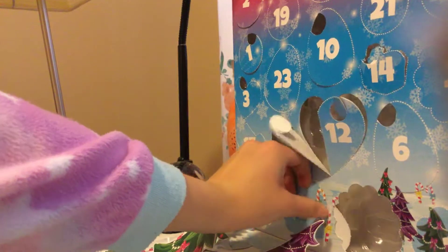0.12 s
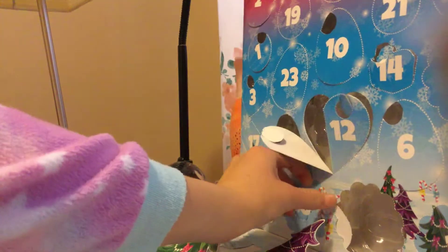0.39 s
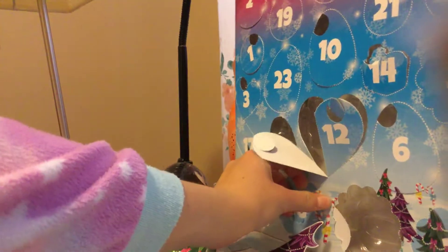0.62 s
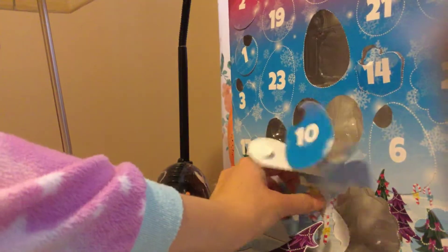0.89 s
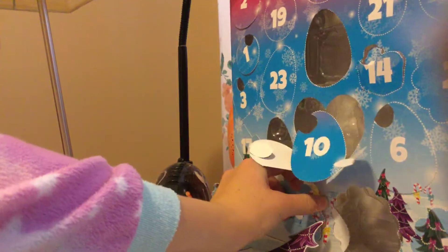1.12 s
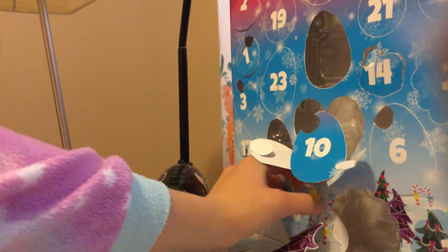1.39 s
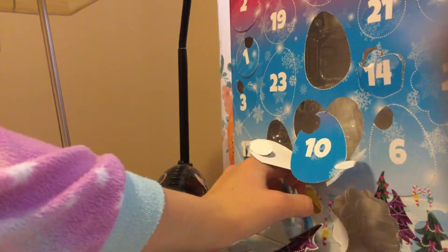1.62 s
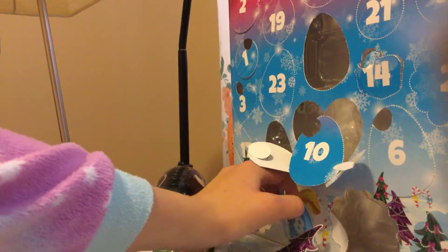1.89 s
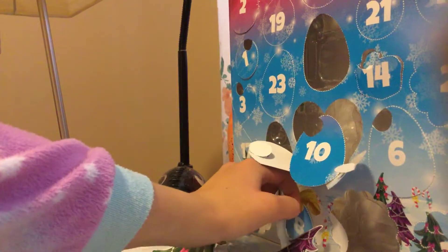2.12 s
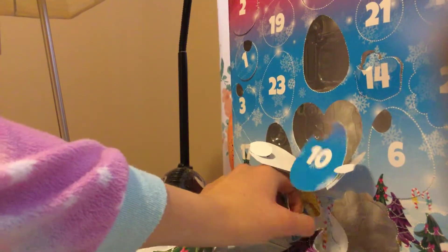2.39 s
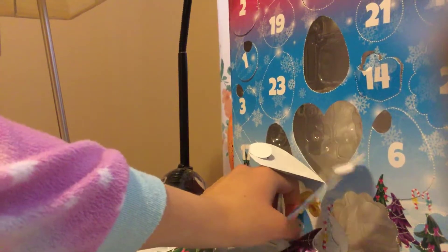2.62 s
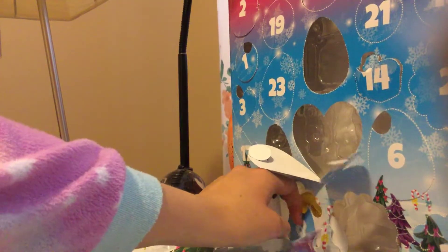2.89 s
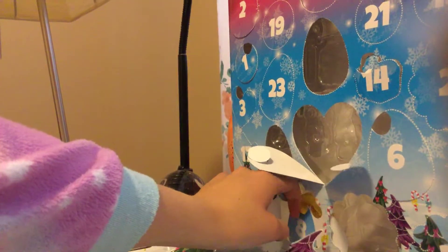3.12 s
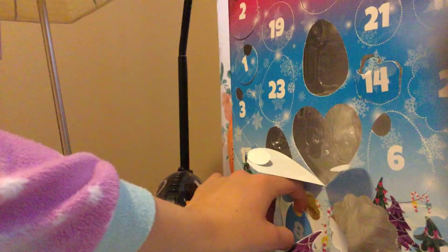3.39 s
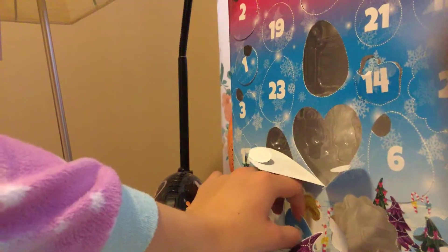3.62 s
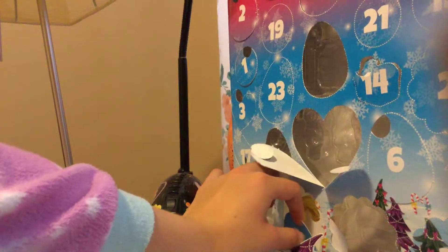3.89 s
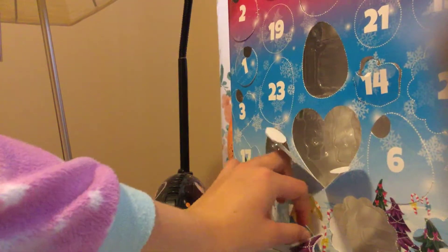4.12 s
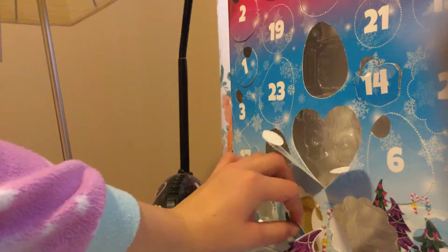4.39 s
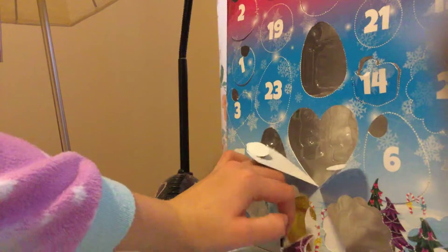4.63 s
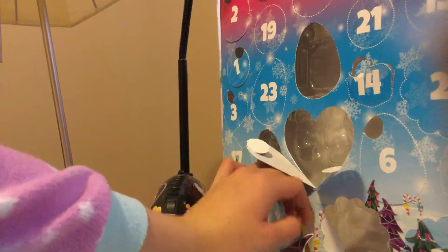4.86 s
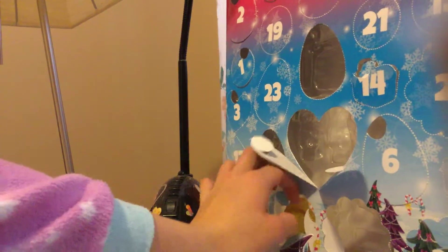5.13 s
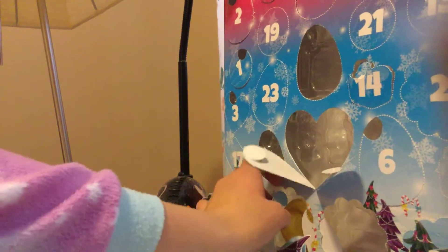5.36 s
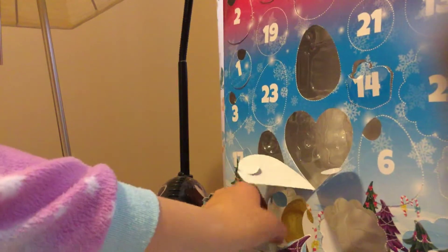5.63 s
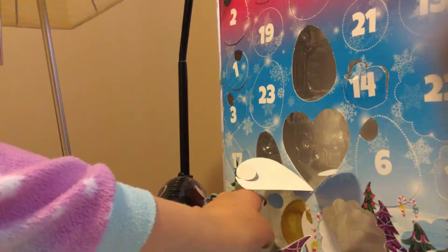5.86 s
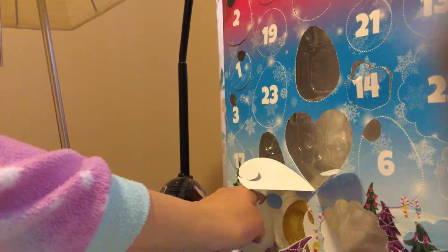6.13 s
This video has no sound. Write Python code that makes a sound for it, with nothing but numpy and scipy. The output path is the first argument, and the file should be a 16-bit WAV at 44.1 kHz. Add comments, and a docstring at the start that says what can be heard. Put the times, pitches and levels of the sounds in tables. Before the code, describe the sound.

A small, quiet room with soft low rumble and slight hiss, heard very close to the hands. In the first 0.4 seconds there is a barely audible fingertip squeak, light rubbing and faint plastic ticks. A small snap at 0.64 leads to the main event at 0.86-0.96: a dense, very loud burst of sharp, bright plastic cracks with a hollow cardboard thump. Crackles and knocks dwindle by 1.2. Then it is nearly still, with only tiny ticks around 1.6. From 2.5 light clicks and crinkles resume, brighter around 3.05, with a soft knock at 3.4 and sparse ticks until 4. Stronger snaps at 4.15, 4.36 and 4.53 come amid rustling drags and a very faint steady high tone. Gentle handling and box bumps continue, with a crisp click at 5.54, a lull near 5.9, and a double snap at 6.06 trailing into small crinkles.

```python
"""A thin plastic tray snaps and crinkles as fingers pry open a cardboard box and work a small toy out.
Each snap is a noise burst ringing tray modes, crisp edge modes and the hollow box, which thumps.
Soft knocks ring the box's air and rock it; drags are clumped stick-slips on plastic, with skin hiss.
A fingertip squeaks faintly at the start. A small room adds a short tail, noise and a faint tone;
handling the box lifts the low rumble of that noise."""
import sys
import numpy as np
from scipy import signal
from scipy.io import wavfile
from scipy.ndimage import uniform_filter1d

SR = 44100
rng = np.random.default_rng(int(sys.argv[2]) if len(sys.argv) > 2 else 0)


def log_audio(samples):
    """Write samples as a 16-bit WAV file to the path given in sys.argv[1]."""
    # one column per channel
    frames = np.atleast_2d(samples).T
    # limit to full scale, then quantise
    limited = np.clip(frames, -1, 1)
    pcm = np.round(limited * 32767).astype(np.int16)
    wavfile.write(sys.argv[1], SR, pcm)


def volts_from_db(level):
    """Convert decibel levels to linear amplitude ratios."""
    exponent = np.asarray(level, float) / 20
    return 10 ** exponent


N = 275625


def evened(x):
    """Scales to rms 1."""
    return x / np.sqrt(np.mean(x ** 2) + 1e-20)


def peaked(x):
    """Scales to peak 1."""
    return x / abs(x).max()


def read(points, hz):
    """Reads a spectrum table on a log-frequency axis."""
    f, value = np.transpose(points)
    return np.interp(np.log(hz + 1), np.log(f + 1), value)


def add(mix, start_s, sound):
    """Mixes a sound in at start_s."""
    part = mix[round(start_s * SR):][:len(sound)]
    part += sound[:len(part)]


# Room noise spectrum. Each row: frequency in Hz, relative density in dB per Hz.
NOISE_SPECTRUM = [(15, -72), (25, -37.5), (49, -24), (114, -10), (150, -14.5), (192, -1), (226, -11),
                  (273, -5), (321, -14), (422, -20.5), (538, -26), (1680, -40), (1830, -40.5), (13300, -51),
                  (15600, -53.5), (16500, -64.5)]
# Room modes the noise fills. Each row: frequency in Hz, width in Hz, height above the noise in dB.
NOISE_MODES = [(56.6, 36, 6.5), (179, 8.8, 0.5), (291, 6.2, 4), (316.3, 8.7, 10)]
# Low rumble of room and handled box. Each row: time in seconds, level in dB.
RUMBLE_LEVEL = [(0.0, -54.5), (0.64, -55.5), (0.92, -47.5), (1.01, -53), (1.43, -54), (1.97, -56),
                (2.87, -52.5), (3.17, -58), (3.55, -53), (3.92, -58), (4.74, -50.5), (5.13, -56.5),
                (5.67, -51), (5.79, -56), (6.08, -55), (6.25, -53.5)]
# Faint tone. Each row: time in seconds, peak level in dB.
WHINE_LEVEL = [(2.5, -100), (2.8, -84.5), (4.6, -77.5), (5.2, -93), (6.25, -99)]
WHINE_HZ = 960


def rumble_and_hiss():
    """Gaussian noise shaped by spectrum and room modes, with drifting patches, plus one faint sine."""
    size, hop = 4096, 1024
    frames, hz = N // hop + 5, np.fft.rfftfreq(size, 1 / SR)
    real, imag, patches = rng.standard_normal((frames, len(hz), 3)).T
    patches_db = 2.0 * evened(uniform_filter1d(uniform_filter1d(patches, 8, 0), 3, 1))
    modes_db = sum(db / (1 + (2 * (hz - f) / width) ** 2) for f, width, db in NOISE_MODES)
    level_db = np.interp(np.arange(frames) * hop / SR, *np.transpose(RUMBLE_LEVEL))
    low = 1 / (1 + (hz / 600) ** 2)  # handling lifts only the low rumble; the hiss above stays put
    rumble_db = np.outer(low, level_db - level_db.mean())
    spectrum_db = (read(NOISE_SPECTRUM, hz) + modes_db)[:, None]
    z = (real + 1j * imag) * volts_from_db(spectrum_db + rumble_db + patches_db)
    noise = signal.istft(z, nperseg=size, noverlap=size - hop)[1][:N]
    t = np.arange(N) / SR
    whine = volts_from_db(np.interp(t, *np.transpose(WHINE_LEVEL))) * np.sin(2 * np.pi * WHINE_HZ * t)
    return volts_from_db(level_db.mean()) * evened(noise) + whine


def squeak():
    """A fingertip's short wavering stick-slip tone: fundamental and third harmonic."""
    squeak_hz, end_s, fade_db_per_s = 1750, 0.092, 600
    first_db, third_db = -77.5, -79
    t = np.arange(N) / SR
    waver = 1 + 0.018 * evened(uniform_filter1d(rng.standard_normal(N), 200))
    phase = 2 * np.pi * np.cumsum(squeak_hz * waver) / SR
    fade = volts_from_db(-fade_db_per_s * np.maximum(t - end_s, 0))
    return fade * (volts_from_db(first_db) * np.sin(phase) + volts_from_db(third_db) * np.sin(3 * phase))


def ring(hz, width_hz, size):
    """Impulse response of one mode: a sine dying faster the wider the mode."""
    t = np.arange(size) / SR
    return np.exp(-np.pi * width_hz * t) * np.sin(2 * np.pi * hz * t)


def body(modes, near_hz=None, fall_db=7.5):
    """Sum of broad modes; each loses fall_db per octave away from the struck patch."""
    total = 0
    for k, (hz, width_hz, db) in enumerate(modes):
        octaves = 0 if near_hz is None else abs(np.log2(hz / near_hz))
        gain = (-1) ** k * volts_from_db(db - fall_db * octaves) * np.sqrt(width_hz)
        total = total + gain * ring(hz, width_hz, size=600)
    return total


def slips(per_s, clump_db, size_db):
    """Dense tiny stick-slips of uneven size that come in clumps."""
    drift = uniform_filter1d(uniform_filter1d(rng.standard_normal(N), 550), 550)
    clumps = volts_from_db(clump_db * evened(drift))
    size = volts_from_db(size_db * np.minimum(rng.exponential(1, N), 5)) * rng.standard_normal(N)
    return size * clumps * (rng.random(N) < per_s / SR)


ENVELOPE_STEP = 32  # samples


def crinkle(modes, shapes, level_db, near_hz, fall_db, order, **slipping):
    """Each mode is a patch shaken by its own slips; each touch favours patches near its pitch."""
    rings = [np.diff(body([mode]), order) for mode in modes]
    near = np.array([volts_from_db(-2 * fall_db * abs(np.log2(hz / near_hz))) for hz, _, _ in modes])
    near *= volts_from_db(2 * level_db) / (np.sum(np.square(rings), 1) @ near)  # power of each touch per patch
    t = np.arange(N) / ENVELOPE_STEP
    total = 0
    for ringing, power in zip(rings, near):
        envelope = np.interp(t, np.arange(len(shapes)), np.sqrt(shapes ** 2 @ power))
        total = total + envelope * signal.oaconvolve(evened(slips(**slipping)), ringing)[:N]
    return total


# Tray modes. Each row: frequency in Hz, width in Hz, relative level in dB.
TRAY_MODES = [(1500, 300, 2.5), (2150, 500, 3.5), (2900, 190, -1), (3509, 380, -4.5), (4270, 520, -2.5),
              (5830, 2100, -12.5), (6970, 670, -16.5)]
# Crisp snap edge and skin hiss. Each row: frequency in Hz, width in Hz, relative level in dB.
EDGE_MODES = [(6200, 900, 3), (8563, 1100, 0), (11195, 920, -1), (12840, 1000, 0), (14300, 720, -3),
              (15500, 800, -8)]
# Finger drags. Each row: start in seconds, length in seconds, tray rubbing level in dB,
# frequency of the patch under the finger in Hz, skin hiss level in dB.
STROKES = [(0.05, 0.062, -77, 2200, -76), (0.125, .055, -80, 2800, -69.5), (0.2, .25, -86, 2800, -79),
           (0.622, 0.056, -75.5, 2800, -73), (0.7, .1, -82.5, 2800, -77), (0.849, .035, -62.5, 3000, -70),
           (0.879, 0.041, -46, 2100, -53), (0.963, 0.047, -53.5, 2300, -54.5),
           (0.99, 0.18, -63, 3600, -69.5), (1.6, .04, -78, 3000, -87), (2.4, .09, -87.5, 3000, -77),
           (2.493, 0.14, -75.5, 2800, -73.5), (2.674, 0.17, -74.5, 3240, -72), (2.89, 0.01, -61, 3730, -61),
           (2.94, 0.04, -74, 4360, -67.5), (3.044, 0.047, -66, 3000, -69), (3.132, 0.031, -69, 2520, -63),
           (3.408, 0.01, -68, 2800, -69), (3.465, 0.017, -76, 4320, -76), (4.028, 0.038, -79.5, 4280, -81),
           (4.126, .04, -70, 2490, -73.5), (4.14, 0.046, -66, 2000, -70), (4.229, 0.035, -59, 2860, -61.5),
           (4.347, 0.26, -67, 2900, -67.5), (4.54, 0.17, -75, 3500, -64), (4.698, 0.061, -63, 2900, -65),
           (4.798, 0.047, -74.5, 2480, -73.5), (4.967, .1, -74, 2800, -74), (5.07, 0.012, -66, 3000, -65),
           (5.165, 0.067, -75.5, 2800, -74.5), (5.29, 0.39, -74.5, 3000, -72.5),
           (5.558, 0.12, -71, 4300, -69), (5.7, 0.066, -72.5, 3000, -72), (5.76, 0.045, -67, 2500, -61.5),
           (5.86, .18, -89.5, 3004, -85.5), (6.074, 0.023, -68, 2980, -57), (6.138, 0.085, -76, 3000, -75)]


def rubbing():
    """Drags, and bent plastic rustling back after snaps, crinkle the tray; dry skin adds fine hiss."""
    grip_db_per_s, lift_db_per_s = 698.5, 398  # build-up before a drag's start, decay after its end
    settle_tray_db, settle_hiss_db, settle_db_per_s = -26, -23, 519  # levels relative to the snap
    hiss_hz = 13500  # skin hiss favours modes near here
    t = np.arange(0, N, ENVELOPE_STEP)[:, None] / SR
    start, length, tray_db, tray_hz, hiss_db = np.transpose(STROKES)
    grip_db = grip_db_per_s * np.maximum(start - t, 0)
    lift_db = lift_db_per_s * np.maximum(t - start - length, 0)
    snap_s, snap_db, snap_hz, edge_db, _ = np.transpose(SNAPS)
    settle = (t > snap_s) * volts_from_db(-settle_db_per_s * np.maximum(t - snap_s, 0))
    shapes = np.hstack([volts_from_db(-grip_db - lift_db), settle])
    tray = crinkle(TRAY_MODES, shapes, np.r_[tray_db, snap_db + settle_tray_db], np.r_[tray_hz, snap_hz],
                   fall_db=7.5, order=1, per_s=1100, clump_db=3.5, size_db=3.0)
    hiss = crinkle(EDGE_MODES, shapes, np.r_[hiss_db, edge_db + settle_hiss_db],
                   np.full(shapes.shape[1], hiss_hz),
                   fall_db=1.5, order=2, per_s=3600, clump_db=3.5, size_db=3.5)
    return tray + hiss


# Hollow box modes. Each row: frequency in Hz, relative level in dB, time to fall 68 dB in seconds.
BOX_MODES = [(201.7, -0.5, 0.052), (280.2, -4.5, .07), (385, -9, 0.077), (512, -15.5, 0.054),
             (625, -8.5, 0.073), (675, -5.5, 0.083), (800, -10, 0.011), (924, -6, 0.018), (993, -12, 0.012),
             (1250, -16, 0.01)]


def box(lift_db, shift=0):
    """The hollow box ringing; lift_db says how strongly the blow reaches each mode."""
    return sum(volts_from_db(db + lift) * ring(hz * (1 + shift), 2.5 / fall_s, size=6000)
               for (hz, db, fall_s), lift in zip(BOX_MODES, lift_db))


CREEP_S = 0.006  # the plastic creaks this long before it lets go


def levelled(x):
    """Scales to rms 1 over the first 3 ms after the plastic lets go."""
    return x / np.sqrt(np.mean(x[round(CREEP_S * SR):][:132] ** 2))


# Tray snaps. Each row: time in seconds, peak level in dB, frequency of the buckling patch in Hz,
# crisp edge rms in dB, box thump rms in dB.
SNAPS = [(0.0658, -53, 1750, -71, -65), (0.22, -63, 2490, -73, -69), (0.2724, -60, 2820, -78, -73),
         (0.338, -57, 1700, -80, -76), (0.373, -61, 2720, -55, -73), (0.6261, -55, 3870, -69, -86),
         (0.6378, -35.5, 3050, -55, -52.5), (0.68, -62, 2800, -66, -72), (0.7174, -55, 2640, -66, -66),
         (0.775, -72, 2800, -69, -80), (0.784, -72, 1320, -66, -79), (0.8645, -11, 3700, -25, -40),
         (0.8698, -27, 2500, -38, -44), (0.8712, -21.5, 2680, -18.5, -27.5),
         (0.8742, -16, 4000, -24, -29.5), (0.8814, -22, 1500, -32, -43), (0.8874, -31, 2070, -34, -38),
         (0.9291, -41, 1500, -39, -53), (0.9488, -20.5, 4840, -27, -47), (0.952, -19, 1870, -45, -37.5),
         (1.0184, -36, 4640, -37, -60), (1.0382, -44, 1920, -52, -54), (1.067, -57, 3500, -58, -65),
         (1.087, -67, 4300, -63, -60), (1.104, -35.5, 4300, -44, -48), (1.1097, -34.5, 2680, -51, -54),
         (1.1528, -45, 3280, -52, -60.5), (1.1716, -52, 4120, -61.5, -58), (1.187, -53, 2990, -67, -70),
         (1.6003, -56, 2760, -65, -74), (1.6242, -57, 2790, -71.5, -73), (2.4866, -38, 1700, -55.5, -62),
         (2.51, -66, 4300, -66, -70), (2.5358, -49.5, 3100, -57.5, -75), (2.5817, -36, 4660, -48, -49),
         (2.588, -63, 4520, -58, -58), (2.6187, -55, 2480, -60, -71), (2.6739, -61, 4370, -57, -67),
         (2.6818, -46, 4660, -41, -58.5), (2.7292, -58.5, 4530, -69, -74), (2.751, -60, 3300, -64, -77),
         (2.7674, -55.5, 3340, -65, -71), (2.7988, -65, 3060, -61, -73), (2.835, -62, 3100, -60.5, -75),
         (2.87, -60, 2800, -70, -77), (2.8934, -46, 4430, -49.5, -74), (2.9085, -58, 4530, -52, -66.5),
         (2.935, -50.5, 4530, -70, -68), (3.0481, -39, 4150, -39, -81), (3.052, -30, 5870, -40, -66),
         (3.0587, -46, 3160, -43, -60), (3.0832, -44, 3760, -55, -72), (3.093, -64, 1600, -56, -80),
         (3.1304, -39.5, 2870, -43, -70.5), (3.1402, -45.5, 3200, -57, -71.5),
         (3.1811, -46.5, 3260, -63, -74), (3.405, -48, 1750, -57, -64.5),
         (3.4108, -43.5, 2870, -54.5, -58.5), (3.467, -62, 4320, -63.5, -67),
         (3.519, -62, 3300, -66.5, -75), (3.5859, -57.5, 4400, -65.5, -78), (3.87, -66, 3000, -69, -75),
         (3.93, -65, 4360, -74, -78), (3.9483, -48.5, 4300, -65, -73.5), (3.956, -53, 4330, -66.5, -73.5),
         (4.1446, -31.5, 2740, -42, -48), (4.1522, -32, 1750, -37.5, -41), (4.227, -50, 2970, -62, -61),
         (4.357, -24, 4770, -34, -46), (4.392, -74, 4200, -62, -78), (4.4558, -60, 2710, -67, -74),
         (4.482, -45, 2920, -58, -70), (4.488, -49, 2920, -54, -70), (4.532, -32.5, 2750, -41, -50),
         (4.5421, -44, 4450, -65, -51.5), (4.5678, -48, 4730, -57, -60), (4.7134, -42.5, 3100, -42, -63),
         (4.717, -43, 3070, -42, -68.5), (4.7344, -49, 2900, -52, -68), (4.7595, -39.5, 2700, -50.5, -59.5),
         (4.7721, -47, 2350, -58.5, -64.5), (4.965, -59.5, 2370, -64, -79.5), (5.0049, -52, 4570, -53, -67),
         (5.017, -62, 3020, -60, -61), (5.0618, -48, 4550, -70, -66), (5.0832, -51, 3250, -52.5, -60.5),
         (5.1521, -52.5, 2440, -75, -73.5), (5.162, -68.5, 2900, -66, -66), (5.2996, -37.5, 3860, -50, -77),
         (5.3041, -46.5, 2900, -61, -71), (5.336, -59, 1680, -65, -73), (5.4822, -46.5, 3230, -68, -65),
         (5.4917, -45.5, 3950, -68, -59), (5.5395, -23.5, 4600, -35.5, -75), (5.5484, -61, 4600, -54, -56),
         (5.5584, -37, 4500, -47, -62), (5.573, -38.5, 4350, -51, -74), (5.5946, -47, 4300, -54, -69),
         (5.6068, -38.5, 4500, -53, -80), (5.635, -58, 4440, -65, -79), (5.74, -56.5, 3100, -63, -64.5),
         (5.8286, -63.5, 1920, -66.5, -64.5), (6.0618, -32, 2650, -33.5, -64.5),
         (6.0659, -30, 3320, -38, -54.5), (6.118, -45.5, 3830, -50.5, -63), (6.146, -70.5, 3000, -68, -77),
         (6.159, -53, 3000, -64, -75), (6.1702, -38.5, 2800, -43.5, -68), (6.181, -46, 4950, -54, -79),
         (6.214, -67.5, 3000, -66, -77)]


def snaps():
    """Each buckle is a faint creak, then a spray of micro-cracks ringing tray, edge and box."""
    fall_ms, fall_ms_per_db = 0.4, 0.1169  # 20 dB fall time at 0 dB; weaker buckles let go more slowly
    box_squeeze = 0.07  # the hand bends the card: rms share by which box modes shift between blows
    out, t = np.zeros(N), np.arange(1400) / SR - CREEP_S
    draws = rng.standard_normal((len(SNAPS), len(t) + len(BOX_MODES) + 1))
    low = np.array([hz < 350 for hz, _, _ in BOX_MODES])
    creak = volts_from_db(-14.5 + 4700 * t) * (t < 0)
    for (snap_s, db, hz, edge_db, box_db), draw in zip(SNAPS, draws):
        grain, spot, bend = draw[:len(t)], draw[len(t):-1], draw[-1]
        u = np.maximum(1000 * t / np.clip(fall_ms - fall_ms_per_db * db, 0.2, 15), 0)
        crack = grain * peaked((1 - np.exp(-u / 0.089)) * volts_from_db(-20 * u))
        spray = crack + grain * creak
        patch = body(TRAY_MODES, hz) + volts_from_db(-2.5) * np.sqrt(550) * ring(hz, 440, size=600)
        # every spot of the box favours other modes
        thump = box(4.0 * spot - 25 * low, box_squeeze * bend)
        tray_sound = peaked(signal.fftconvolve(spray, np.diff(patch)))
        edge_sound = levelled(signal.fftconvolve(crack, np.diff(body(EDGE_MODES), 2)))
        box_sound = levelled(signal.fftconvolve(crack, np.diff(thump)))
        add(out, snap_s - CREEP_S, volts_from_db(db) * tray_sound)
        add(out, snap_s - CREEP_S, volts_from_db(edge_db) * edge_sound)
        add(out, snap_s - CREEP_S, volts_from_db(box_db) * box_sound)
    return out


# Knocks moving the whole box. Each row: time in seconds, box air peak in dB, rocking rms in dB.
KNOCKS = [(0.872, -19.5, -45.5), (0.887, -24, -53), (0.943, -43, -73), (1.028, -39, -53.5),
          (1.118, -40.5, -49.5), (3.412, -43.5, -73.5), (4.149, -35.5, -61), (4.355, -61, -59),
          (4.534, -54, -58), (4.715, -42, -57), (5.171, -47.5, -65), (5.263, -45, -54.5),
          (5.351, -49, -60.5), (5.476, -42, -64), (5.809, -41, -62), (6.062, -38.5, -76)]


def knocks():
    """A soft push rings the box's low air modes and rocks the whole box once."""
    air = np.convolve(np.hanning(95), box([-14.0 * (hz > 350) for hz, _, _ in BOX_MODES]))
    no_bass = signal.butter(5, 170, "high", fs=SR, output="sos")  # a small box radiates no deep bass
    air = peaked(signal.sosfilt(no_bass, air))
    rock = evened(np.hanning(1100) * ring(90, 10, size=1100))
    out = np.zeros(N)
    for knock_s, air_db, rock_db in KNOCKS:
        add(out, knock_s, volts_from_db(air_db) * air)
        add(out, knock_s, volts_from_db(rock_db) * rock)
    return out


# Room decay. Each row: frequency in Hz, time to fall 60 dB in seconds.
ROOM_DECAY = [(300, 0.35), (800, 0.36), (2100, 0.099), (5500, 0.11), (14600, 0.042)]
ROOM_DB = -12


def room(x):
    """Sparse taps of random sign, each band dying at its own speed."""
    taps = np.zeros(SR // 2)
    at = np.arange(120, len(taps) - 20, 20)
    taps[at + rng.integers(0, 20, len(at))] = rng.choice([-1., 1.], len(at))
    hz, t, z = signal.stft(taps, SR, nperseg=256)
    decay = volts_from_db(-60 * t / read(ROOM_DECAY, hz)[:, None])
    tail = signal.istft(z * decay, SR, nperseg=256)[1]
    return signal.oaconvolve(x, tail / np.linalg.norm(tail))[:N]


def scene():
    """Hands on the box, close, in a small room with low rumble and hiss."""
    hands = snaps() + knocks() + rubbing() + squeak()
    return (hands + volts_from_db(ROOM_DB) * room(hands) + rumble_and_hiss())[None]


def band_limit(x):
    """A steep low-pass at the top of the band."""
    return signal.sosfilt(signal.butter(12, 17000, fs=SR, output="sos"), x)


def record(dry):
    """The microphone loses the deepest bass; a steep low-pass limits the treble."""
    bass_hz, treble_hz = 41, 15900
    thin = signal.sosfilt(signal.butter(2, bass_hz, "high", fs=SR, output="sos"), dry)
    low_pass = signal.firwin(127, treble_hz, window=("kaiser", 8), fs=SR)[None]
    mix = signal.oaconvolve(thin, low_pass, "same")
    return band_limit(mix)


dry = scene()
out = record(dry)
log_audio(out)
```